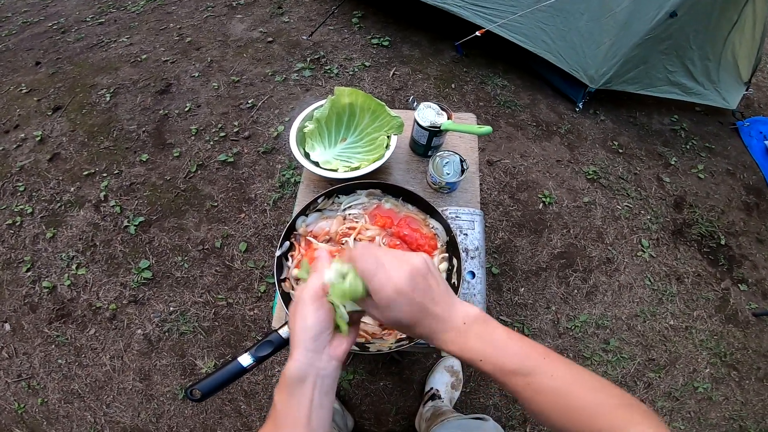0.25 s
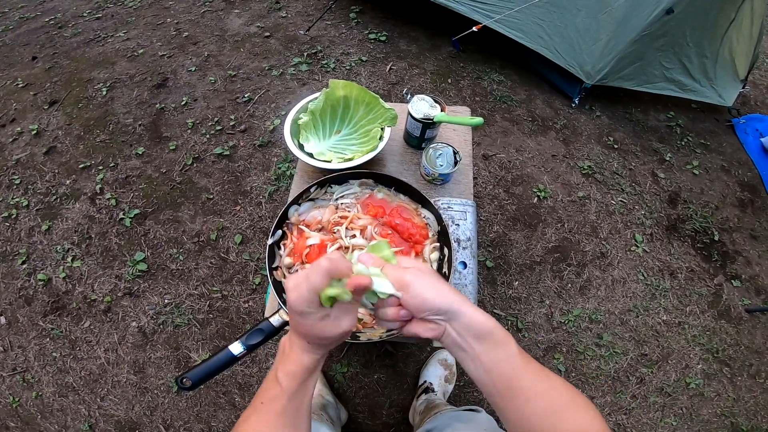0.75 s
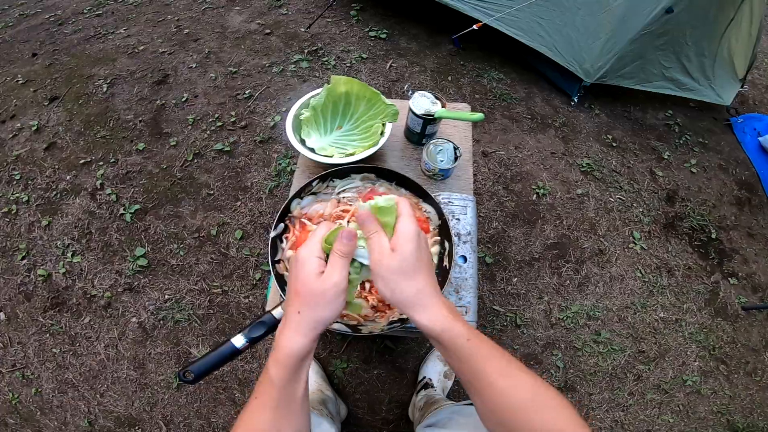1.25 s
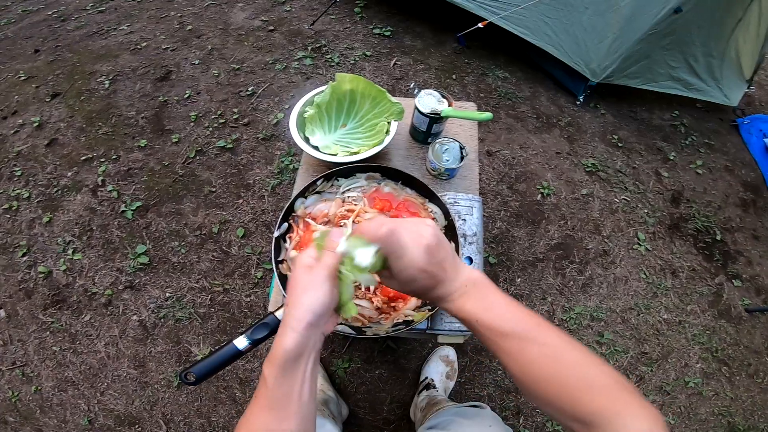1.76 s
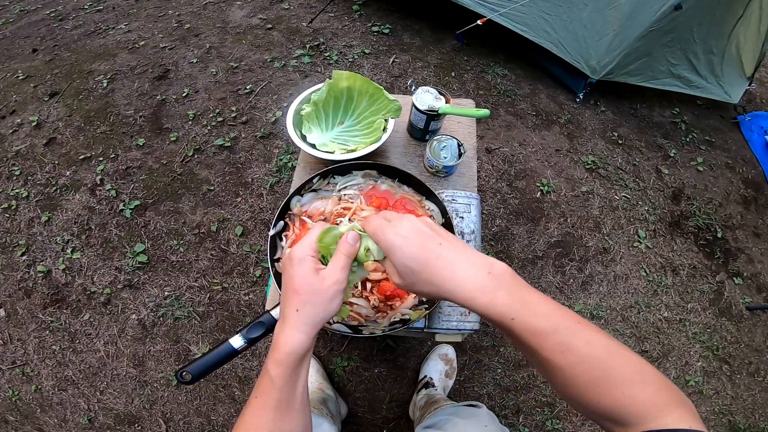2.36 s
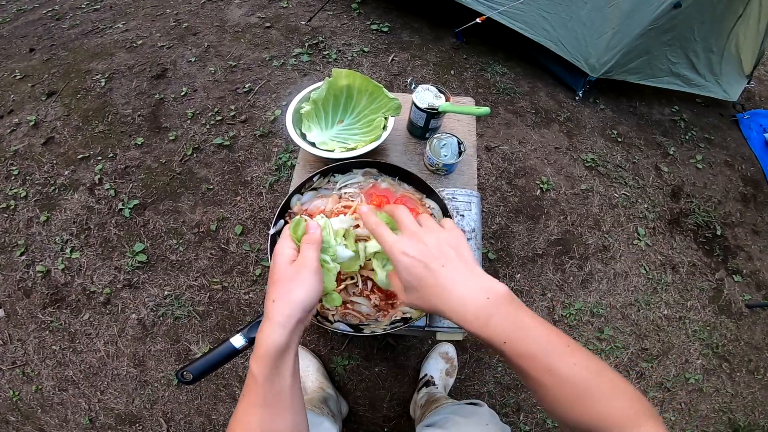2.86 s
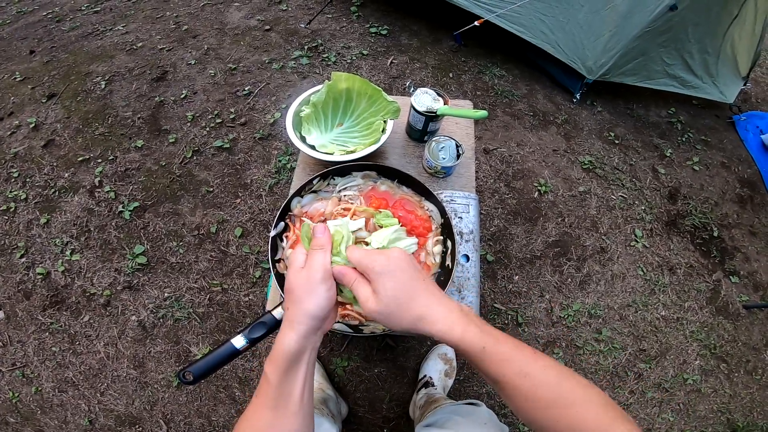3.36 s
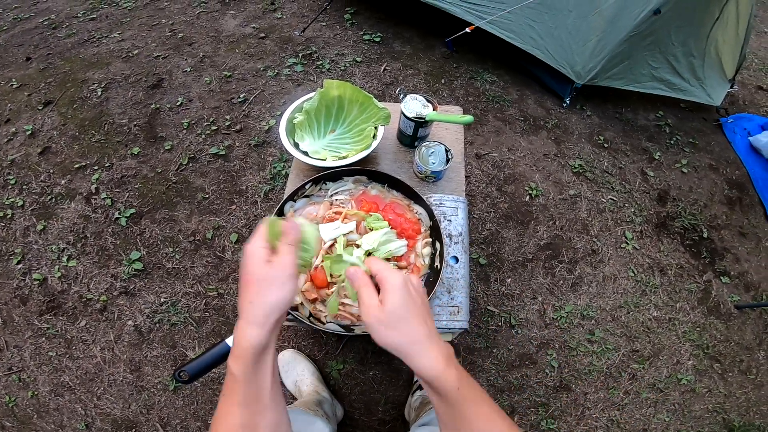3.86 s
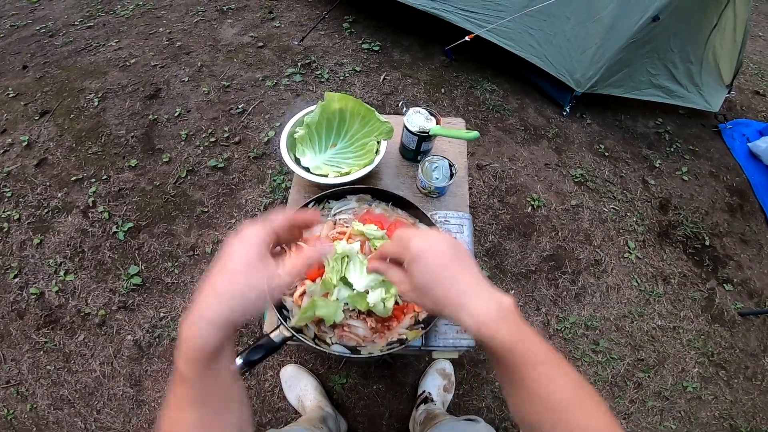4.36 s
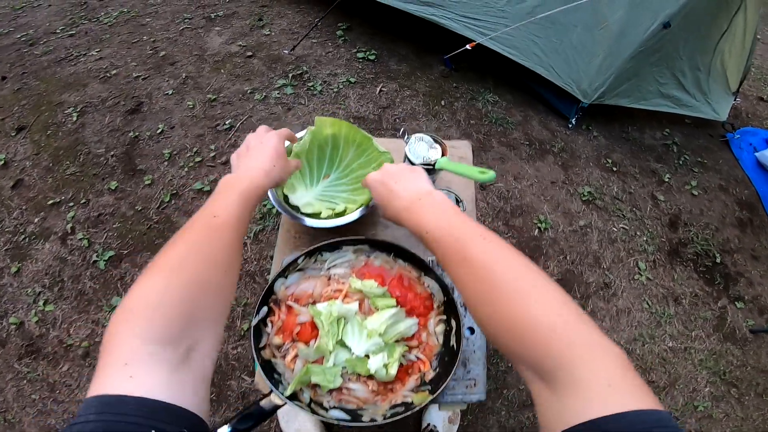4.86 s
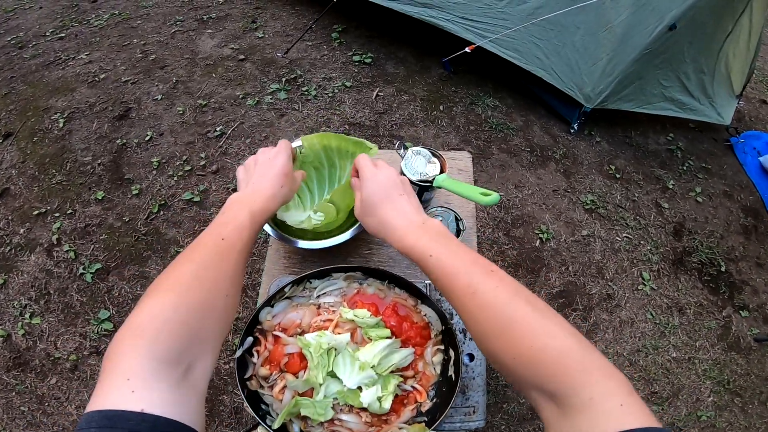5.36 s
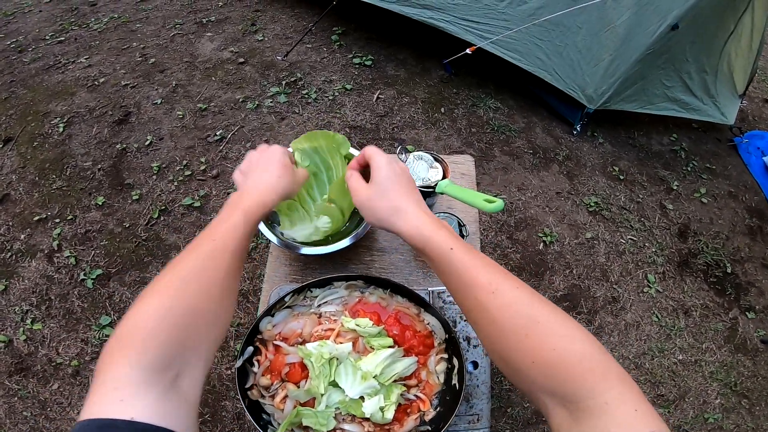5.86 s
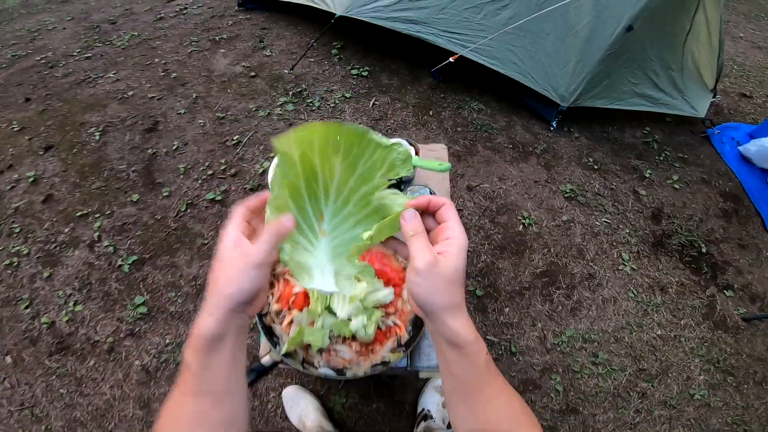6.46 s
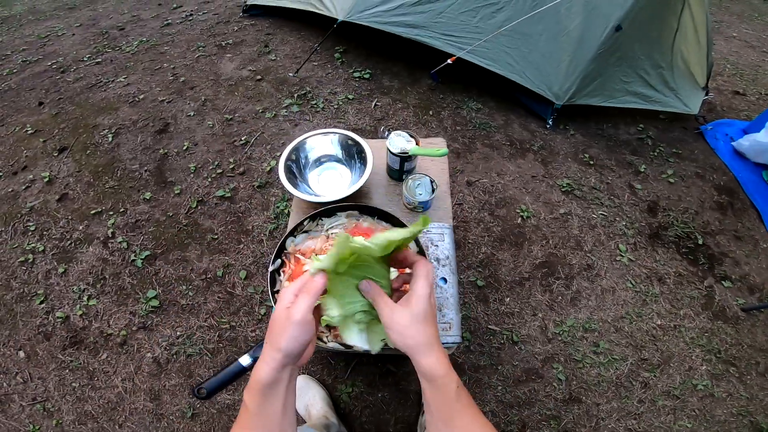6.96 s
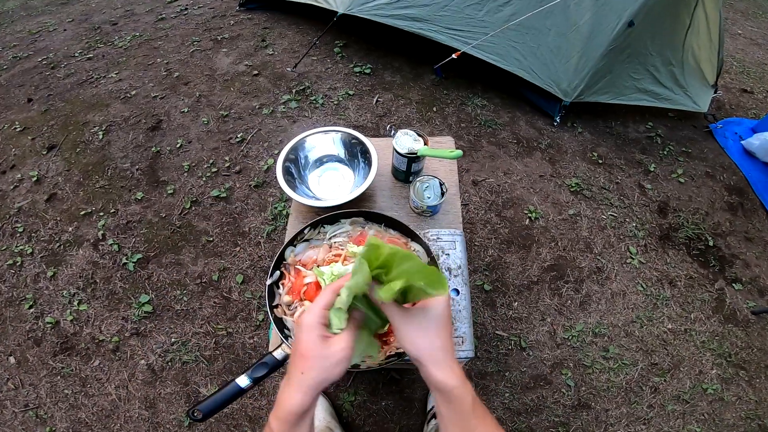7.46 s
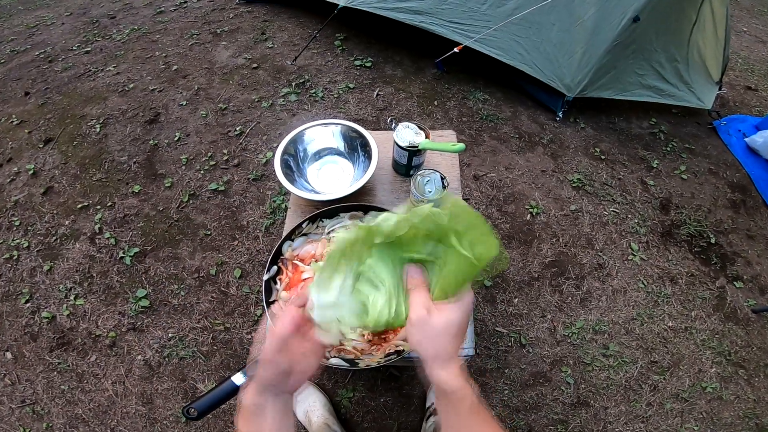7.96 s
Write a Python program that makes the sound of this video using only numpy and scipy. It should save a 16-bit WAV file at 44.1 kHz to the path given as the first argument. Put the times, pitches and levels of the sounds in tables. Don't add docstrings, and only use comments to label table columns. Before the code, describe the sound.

Outdoors at a campsite, a continuous shrill cicada chorus with faint breeze rumble. Close in front, hands tear a crisp cabbage leaf in five bursts of wet, splintery snaps with short gaps. Then a steel bowl rings faintly and knocks on a wooden table as a leaf is lifted out, and the whole leaf bends with duller pops and crackles. Stereo microphone near the head.

```python
import sys
import numpy as np
from scipy import signal
from scipy.fft import rfft, irfft, next_fast_len
from scipy.io import wavfile
from scipy.ndimage import uniform_filter1d, map_coordinates

SR = 44100
rng = np.random.default_rng(int(sys.argv[2]) if len(sys.argv) > 2 else 0)


def dump(signal):
    limited = np.clip(np.atleast_2d(signal).T, -1, 1)
    pcm = np.round(limited * 32767).astype(np.int16)
    wavfile.write(sys.argv[1], SR, pcm)


def amplitude_ratio(level_db):
    exponent = np.asarray(level_db, float) / 20
    return 10 ** exponent


N = 362061

# t/s, peak level/dB, leaf f/Hz, hand hollow level/dB, edge level/dB
TORN_1 = [(0.0057, -21.5, 3315, -17, -12.5), (0.0102, -25.5, 3312, -17.5, -20),
          (0.0144, -22.5, 3288, -20, -20.5), (0.0199, -32, 3560, -16.5, -19.5),
          (0.0289, -31.5, 3516, -7, -20), (0.0403, -31, 3778, -15.5, -20), (0.069, -22.0, 3588, -21, -10),
          (0.0786, -19.5, 3250, -14, -14), (0.0971, -29, 2824, 2.5, -20), (0.1281, -17.0, 3784, -11, -21),
          (0.1513, -34, 3300, -12.5, -20), (0.1559, -18.5, 4406, -17.5, -20),
          (0.1645, -18.5, 3268, -13, -2), (0.1784, -28.5, 3480, -15.5, -3.5),
          (0.2171, -26.5, 3211, -11.5, -20.5), (0.2258, -30, 3411, -7.5, -20),
          (0.2543, -34, 3534, -13, -20), (0.2671, -32.5, 3690, -13, -20), (0.3257, -34.5, 3407, -16, -20),
          (0.3415, -33, 3814, -22, -5)]
TORN_2 = [(0.448, -35, 2757, -16.5, -20), (0.4913, -22.0, 3438, -20.5, -14),
          (0.508, -30.5, 3480, -15.5, -4), (0.5218, -31, 3005, -18, -20), (0.551, -33, 2826, -15, -2.5),
          (0.5562, -28.5, 3878, -21, -20), (0.5694, -20, 3590, -12, -3), (0.5791, -13, 3262, -15.5, -9),
          (0.5853, -29, 3610, -15, -20), (0.6028, -25.5, 3368, -9, -20), (0.6097, -21, 4177, -15, 5),
          (0.6188, -22.5, 3920, -12, -15), (0.6286, -22, 4229, -22, -9), (0.6516, -22, 3546, -12.5, -3),
          (0.6625, -26, 3704, -17.5, -20), (0.6793, -22.5, 4006, -14, -3.5),
          (0.6881, -28.0, 3970, -14, 0.5), (0.6951, -22.0, 3516, -11, 4.5), (0.701, -27.5, 4130, -7.5, 1),
          (0.7069, -30.5, 3570, -7.5, 1), (0.7231, -30.5, 3480, -6, -3), (0.7361, -23.5, 3215, -10.5, 1.5),
          (0.7869, -33, 3460, -16.5, 2.5), (0.7981, -34.5, 3365, -8, 9), (0.8081, -31, 3538, -14.5, -12),
          (0.8126, -30, 4000, -9.5, -20), (0.8372, -28.5, 4010, -6, -13), (0.845, -27.5, 3582, -7, -6),
          (0.8499, -29.0, 3790, -13.5, -20), (0.987, -33, 3403, -22, -20)]
TORN_3 = [(1.3066, -30, 2976, -14.5, -5), (1.3168, -27.5, 3653, -16, 0.5), (1.3508, -18.5, 4289, -19, -1.5),
          (1.3822, -31.5, 2885, -15, 2), (1.4354, -18, 3392, -16.5, -12.5), (1.4413, -32, 3200, -12, -20),
          (1.4649, -26.5, 3641, -13.5, -8), (1.4793, -27, 3798, -20, -6.5), (1.4974, -30, 4260, -16.5, 1.5),
          (1.5241, -24.0, 3780, -14, -9), (1.5267, -25, 3502, -16.5, -1.5), (1.5292, -13, 3755, -8.5, -4),
          (1.5644, -23.5, 3234, -6, -11), (1.5943, -33, 3240, -1.5, -1), (1.61, -30.0, 3791, -12, 2.5),
          (1.6689, -24.5, 3628, -20, -9.5), (1.7454, -40, 3460, 4, -2), (1.7719, -27.5, 3390, -5.5, 0),
          (1.7778, -31.0, 2818, -11.5, -20), (1.7811, -34.5, 2830, -3.5, -20)]
TORN_4 = [(2.3491, -29, 3850, -14, -12), (2.3574, -23, 3673, -16.5, -7.5), (2.3675, -27.5, 3300, -8.5, -20),
          (2.3873, -25.5, 3840, -15.5, -11), (2.3919, -22.5, 3815, -20.5, -20.5),
          (2.3958, -31, 3920, -16.5, -20), (2.413, -31, 3360, -12, -2), (2.4252, -29, 4010, -16.5, -4),
          (2.4596, -24.5, 3763, -21, -5), (2.472, -28.5, 3673, -18.5, -7.5),
          (2.4984, -27.0, 3770, -19, -5.5), (2.5158, -32.5, 3085, -15.5, -20),
          (2.5289, -19.5, 3455, -23.5, -9), (2.5374, -27.5, 3820, -13.5, 1),
          (2.5429, -30.5, 4210, -11.5, 2), (2.5596, -28.0, 3415, -5, -1), (2.5766, -31.0, 3780, -7, 2.5),
          (2.6211, -27, 3582, -17.5, -8.5)]
TORN_5 = [(3.2257, -25.0, 3058, -21.5, -5.5), (3.2297, -31.5, 4243, -19.5, -6),
          (3.249, -26.5, 3526, -12, -5.5), (3.2566, -30.5, 3050, -10, -20),
          (3.2658, -29.5, 4210, -7.5, -20), (3.2784, -18.5, 3527, -14, -4.5),
          (3.2949, -26.5, 4282, -4.5, 4.5), (3.299, -29.5, 3440, -11.5, 4.5),
          (3.3112, -29, 3150, -9.5, -20), (3.3185, -21, 4020, -11, 0.5), (3.324, -23, 3043, -12.5, 5),
          (3.3981, -33, 2980, -6.5, -20), (3.4054, -29.5, 3414, -18.5, 1.5), (3.4112, -32, 3210, -6.5, 5),
          (3.421, -22, 3435, -8.5, -7.5), (3.4301, -18.5, 3763, -18.5, -2), (3.4342, -29, 4370, -9.5, -4),
          (3.4747, -19.5, 3876, -21.5, -10), (3.5222, -20.5, 4030, -8.5, -8.5),
          (3.5583, -32, 4210, -11.5, -20), (3.5637, -25.5, 3740, -14, -3.5),
          (3.5681, -17.5, 3347, -20, -7.5), (3.5882, -22, 4014, -14.5, -9.5),
          (3.6022, -20.5, 4039, -14.5, -6.5), (3.607, -23, 4262, -16.5, 3), (3.6521, -30, 3934, -18.5, 1),
          (3.6705, -30, 3757, -7.5, -20), (3.69, -27.5, 4320, -14, -10), (3.7089, -30.5, 3890, -17, -0.5),
          (3.7187, -27.5, 3592, -15.5, 1), (3.731, -22.0, 3494, -12, -10.5),
          (3.7378, -15.5, 3765, -19.5, -6), (3.7443, -22.0, 3775, -6.5, -3),
          (3.7556, -32.5, 2900, -10, -20), (3.772, -37, 3000, -9.5, -20), (3.787, -37.5, 3006, -7.5, -20)]
# hollow f/Hz, palm f/Hz, palm level/dB
HAND_CAVITIES = [
    (1838.9, 1114, -14),
    (1580, 751.2, -9.5),
    (1647.3, 853, -14),
    (1930, 784.4, -11),
    (1930, 1012.1, -8),
]
# start t/s, end t/s, level/dB
TEAR_HOLDS = [
    (0, .03, -43.5),
    (.05, .27, -52),
    (.28, .45, -57.5),
    (.46, .85, -53),
    (.67, .73, -44),
    (.81, .853, -42),
    (1.3, 1.61, -54),
    (1.76, 1.79, -48.5),
    (2.34, 2.62, -49),
    (3.22, 3.75, -51),
]
# start t/s, end t/s, level/dB
BEND_HOLDS = [
    (6.78, 8.21, -57.5),
    (6.99, 7.07, -56.5),
    (7.62, 7.88, -49.5),
    (7.9, 8.07, -57),
    (7.25, 7.36, -58.5),
]
# t/s, peak level/dB, f/Hz, second f/Hz, its level/dB
FOLD_POPS = [(5.7597, -29, 3000, 1900, -1), (6.1656, -35, 2197, 1109, -4), (6.3148, -31, 3510, 1920, -16),
             (6.7992, -36, 1679, 1001, 0.5), (6.8425, -37, 890.6, 3546, -15),
             (6.9052, -37.5, 2270, 1340, -6.5), (7.014, -29.0, 1137, 2585, -10),
             (7.0345, -39, 1110, 3840, -1), (7.05, -39.0, 1090, 1580, -10), (7.061, -38, 1180, 2752, -7.5),
             (7.1192, -32.5, 1312, 2923, -13), (7.1315, -34, 1930, 842, -0.5),
             (7.173, -33.5, 1062, 2520, -18.5), (7.192, -30.5, 2522, 1101, -5), (7.2774, -39, 891, 2420, 1),
             (7.2971, -26, 3320, 1057, -2.5), (7.3466, -33.5, 1699, 1149, -3.5),
             (7.3554, -27, 1017, 3699, -9), (7.4738, -31, 1892, 1110, -1), (7.4796, -34, 1890, 3230, -7),
             (7.5501, -36.5, 1683, 861, -6), (7.571, -35.0, 1076, 1949, -6), (7.593, -31.5, 2219, 1067, -3),
             (7.65, -34.5, 1178, 809, -2), (7.6586, -36, 1140, 699.6, -0.5),
                (7.6887, -33.5, 1100, 2250, -10.5), (7.7246, -36, 1030, 1500, -6),
                (7.7494, -35.5, 1080, 1770, -2), (7.7886, -36, 748.3, 1644, -2.5),
                (7.8321, -33, 1510, 3553, 1), (7.8429, -32, 861.3, 1272, -1.5),
                (7.8483, -31, 1070, 1862, -2), (7.8556, -34.0, 979.4, 2022, -4.5),
                (7.8872, -31.5, 1667, 1030, 0), (7.9065, -26.5, 1789, 963, -1),
                (7.913, -33, 1711, 3042, 0.5), (7.9695, -23.0, 3029, 1804, -0.5),
                (7.974, -30.5, 1800, 3040, 0), (8.0277, -26, 1737, 795.2, -2), (8.0567, -33, 1768, 3006, 0),
                (8.117, -33, 2825, 1211, -1.5), (8.1397, -30, 1859, 1030, -11),
                (8.1643, -29.5, 2887, 2013, -4.5), (8.1705, -27, 1800, 3226, -4.5)]
STRAY_POPS = [
    (3.503, -32, 1969, 3790, -4),
    (2.597, -35, 1190.7, 3300, -4),
    (7.242, -42, 1128, 1650, -3.5),
    (7.979, -31, 2173, 3322, 0),
    (7.632, -35.5, 870.7, 1130, -5),
]

# f/Hz, level/dB, t60/s
BOWL_MODES = [(1379.9, -1.5, 0.3131), (1409.5, 1, 0.1376), (1593.9, -8, 0.3106), (1920, -8, 0.2143),
              (2070, -5, 0.603), (2440.7, -1, 0.4), (2717.4, -5, .3), (3011.8, 0, 0.28),
              (3646.7, -7, 0.315)]
# t/s, level/dB
BOWL_TOUCHES = [
    (5.039, -38.5),
    (5.195, -51),
    (5.358, -40),
    (5.478, -51),
    (5.631, -54.5),
]
# f/Hz, width/Hz, level/dB
BOARD_MODES = [(206.34, 40, -2), (279.28, 22, 4), (520, 400, -15), (1030, 300, -18), (1594, 516, -17),
               (145.03, 67.97, -7)]
# t/s, peak level/dB
BASE_KNOCKS = [(5.034, -53), (5.163, -50), (5.19, -47.5), (5.215, -52), (5.344, -38.5), (5.379, -44.5),
               (5.442, -29.5), (5.469, -36), (5.499, -44), (5.61, -36), (5.629, -35.5), (5.647, -34.5),
               (5.672, -47), (5.69, -48), (6.62, -49)]
# t/s, half length/s, f/Hz, glide/(Hz/s), level/dB
SQUEAKS_AND_POP = [
    (5.143, .0035, 3650, -35000, -28),
    (5.151, .002, 3250, -20000, -35),
    (2.087, .005, 950, 0, -45),
]

# t/s, left cicada, right cicada, katydid
THROB_COUNTS = [
    (0, .2, -.37, .25),
    (4.5, 48.78, 47.95, 126.1),
    (8.3, 89.75, 88.1, 232.3),
]
# throb column, click rate/Hz, slack f/Hz, tight f/Hz, throb depth/dB, level/dB, pan/dB, ring t60/s
NEAR_SINGERS = [
    (0, 324, 6400, 7600, 7, -48, 9, .0035),
    (0, 324, 10800, 13800, 8, -64.5, -2, .0008),
    (1, 309, 5420, 5680, 10, -39, -9, .009),
    (2, 470, 9000, 9300, 10, -59, 4, .005),
]
# t/s, far mass/dB, late high singer/dB, near singers' swell/dB
CHORUS_LEVELS = [
    (0.0, -34.5, -56, -1.5),
    (2.63, -34, -60.5, -1.5),
    (3.5, -34, -52.5, -.3),
    (4.7, -35, -56.5, 1.5),
    (8.21, -33.5, -59, .7),
]
# f/Hz, density/(dB per Hz)
MASS_SPECTRUM = [(1760, -44), (3000, -31), (3400, -38.5), (4090, -21), (4660, -5.5), (5540, -1.5),
                 (7250, -4.5), (7880, -12), (8620, -23), (9360, -26), (10600, -23), (14200, -33),
                 (14900, -38), (15600, -44)]
# f/Hz, left minus right/dB
MASS_BALANCE = [(60, -3), (110, -2), (200, 3), (380, 3), (700, -4), (1290, -7.5), (2380, 0), (4400, -2.5),
                (8120, -7.5), (15000, 10)]
# f/Hz, left-right likeness
MASS_LIKENESS = [(3000, 0.4334), (5500, 0.2226), (8000, 0.0654), (15000, 0.045)]

# t/s, peak level/dB, 20 dB fade/s, extra flutter/dB
WIND_GUSTS = [(.223, -43, 0.2865, 1), (.656, -48, 0.1042, -3.5), (1.08, -55, 0.4276, 0),
              (1.545, -44, 0.1596, -2), (1.731, -49, 0.4843, -1), (2.24, -44.5, 0.3528, -1.5),
              (2.35, -46.5, 0.1463, -2), (2.7, -60.5, 0.1739, 6), (2.97, -58.5, 0.2137, 3.5),
              (3.44, -57.5, 0.2346, 3.5), (3.955, -54, 0.1607, -2), (4.46, -50, 0.4152, 1),
              (5.066, -56.5, 0.1069, 1.5), (5.5, -57, 0.001, 9), (5.66, -54.5, 0.1133, 6),
              (5.987, -46.5, 0.2139, -2), (6.294, -48, 0.3011, 11), (6.64, -49.5, 0.2235, 7),
              (7.12, -58.5, 0.3337, 1), (7.49, -57, 0.02, -0.5), (7.644, -46, 0.2094, 5),
              (8.2, -46, 0.3357, -4)]
# f/Hz, density/(dB per Hz)
BUFFET_SPECTRUM = [(8, -32), (22, 1.5), (40, 1), (60, -15.0), (100, -38.5), (200, -120)]
FLUTTER_SPECTRUM = [(30, -56), (60, 1.5), (100, -9.0), (150, -12), (300, -29.0), (600, -120)]
# f/Hz, density/(dB per Hz)
AIR_SPECTRUM = [(59, -46), (120, -10), (318, -7.5), (366, -6.5), (490, -7.5), (1160, -7.5), (1740, -9),
                (3380, -9), (4000, -6), (5200, -12.5), (8800, -120)]
# f/Hz, left-right likeness
AIR_LIKENESS = [(100, 0.543), (300, 0.672), (700, 0.395), (1500, 0.04604), (3000, 0.6956)]

GRIP_S, LET_GO_S = 0.04776, 0.02221
TRAIL_DB, TRAIL_GROWTH, TRAIL_S = -48, 0.4366, 0.011315
LEAD_S, LEAD_CYCLES = .0002, .3
LEAF_WIDTH, HOLLOW_WIDTH, PALM_WIDTH, CREASE_WIDTH = .52, .22, 0.34355, 0.33597
HOLLOW_DB, EDGE_DB, SPRAY_DB, EDGE_HZ, SPRAY_HZ = -4, -2, -27, 6221, 9600
LULL_DB, FLUTTER_DB, FLUTTER_GROWTH = -72.5, -45, 1.7357
AIR_DB, AIR_SWELL_DB = -51.5, 2.5


def unit(x):
    return x / np.sqrt(np.mean(x ** 2) + 1e-20)


def along(points, hz):
    f, value = np.transpose(points)
    return np.interp(np.log(hz + 1), np.log(f + 1), value)


def curves(rows):
    s, *columns = np.transpose(rows)
    return [np.interp(np.arange(N) / SR, s, column) for column in columns]


def wobble(rate_hz):
    knots = rng.standard_normal(int(N * rate_hz / SR) + 4)
    return map_coordinates(knots, [np.arange(N) * rate_hz / SR])


def filtered(x, response):
    size = next_fast_len(N + SR // 2)
    return irfft(rfft(x, size) * response(np.fft.rfftfreq(size, 1 / SR)), size)[..., :N]


def resonance(f, hz, width_hz):
    return 1j * f * width_hz / (hz * hz - f * f + 1j * f * width_hz)


def panned(x, pan_db):
    return np.array([x * amplitude_ratio(pan_db / 2), x * amplitude_ratio(-pan_db / 2)])


def rush(spectrum, alike, patchy_db):
    z = signal.stft(rng.standard_normal((2, N)), nperseg=512)[2]
    field = uniform_filter1d(rng.standard_normal(z.shape[1:]), 6, 0)
    field = uniform_filter1d(field, 8, 1)
    pair = signal.istft(z * amplitude_ratio(patchy_db * unit(field)), nperseg=512)[1][:, :N]

    def mid_side(hz):
        angle = np.arccos(np.clip(along(alike, hz), -1, 1)) / 2
        return amplitude_ratio(along(spectrum, hz)) * [np.cos(angle), np.sin(angle)]

    mid, side = filtered(pair, mid_side)
    return unit(np.array([mid + side, mid - side]))


def grains(times, hz, gain, t60, size=256):
    start = np.floor(times * SR).astype(int) + 1
    index = start[:, None] + np.arange(size)
    t = index / SR - times[:, None]
    cycles = hz[:, None] * t
    attack = np.sin(np.pi / 2 * np.minimum(cycles / 2, 1)) ** 2
    decay = amplitude_ratio(-60 * t / np.reshape(t60, (-1, 1)))
    waves = gain[:, None] * attack * np.sin(2 * np.pi * cycles) * decay
    return np.bincount(index.ravel(), waves.ravel(), N + SR)[:N]


def foliage(x, t60):
    t = np.arange(SR // 4) / SR
    tail = rng.standard_normal((2, len(t))) * amplitude_ratio(-60 * t / t60)
    return signal.fftconvolve(x[None], tail / np.linalg.norm(tail[0]), axes=1)[:, :N]


def swell(start, end, db, rise_s, fall_s):
    clock = np.arange(0, N, 32) / SR
    away = np.maximum(start - clock, 0) / rise_s + np.maximum(clock - end, 0) / fall_s
    return np.repeat(amplitude_ratio(db - 20 * away), 32)[:N]


def cabbage():
    tear, fold = tearing(), folding()
    return panned(tear, -3) + panned(fold, -8) + amplitude_ratio(-17) * foliage(tear + fold, t60=.02)


def tearing():
    pieces = [TORN_1, TORN_2, TORN_3, TORN_4, TORN_5]
    torn = [row for piece in pieces for row in piece]
    breaks = []
    for piece, (hollow_hz, palm_hz, palm_db) in zip(pieces, HAND_CAVITIES):
        chance = rng.standard_normal((len(piece), 4))
        for (s, db, leaf_hz, hollow_db, edge_db), (a, b, c, d) in zip(piece, chance):
            hands_db = hollow_db + HOLLOW_DB
            modes = [(leaf_hz, LEAF_WIDTH, -1.5),
                     (hollow_hz * (1 + 0.03496 * a), HOLLOW_WIDTH, hands_db),
                     (palm_hz, PALM_WIDTH, hands_db + palm_db + 3 * b),
                     (EDGE_HZ * (1 + 0.04135 * c), .3, edge_db + EDGE_DB),
                     (SPRAY_HZ * np.exp(.05 * d), .12, 0.378 * edge_db + SPRAY_DB + 3 * c)]
            breaks.append((s, db - 1.2 + .05 * (db + 18), modes))
    tear = amplitude_ratio(3) * snaps(breaks, t60=0.006352, rise_s=0.0002719)
    pull = effort(TEAR_HOLDS, torn, TRAIL_DB)
    return tear + amplitude_ratio(2) * crackle(pull, count=13000, hz=3200, spread=.3, cycles=5.696, size_db=2.9)


def folding():
    folds = FOLD_POPS
    width = lambda hz: CREASE_WIDTH * (hz / 2200) ** 0.5843
    pops = []
    for s, db, hz, second_hz, second_db in [*folds, *STRAY_POPS]:
        second_level_db = second_db - 1.5 + 4 * np.log2(second_hz / hz)
        modes = [(hz, width(hz), -1.5), (second_hz, width(second_hz), second_level_db)]
        pops.append((s, db + .22 * (db + 27.5), modes))
    fold = amplitude_ratio(-.7) * snaps(pops, t60=0.005544, rise_s=0.0004383)
    bend = effort(BEND_HOLDS, folds, TRAIL_DB - 10.5)
    fold += amplitude_ratio(-3.0) * crackle(bend, count=12000, hz=946.65, spread=0.24778, cycles=11.32, size_db=2.5)
    fold += amplitude_ratio(-6.5) * crackle(bend, count=9000, hz=1800, spread=0.2126, cycles=8.68, size_db=2.5)
    fold += amplitude_ratio(-7) * crackle(bend, count=4000, hz=211.14, spread=0.30426, cycles=2.91, size_db=1.5)
    return fold


def snaps(rows, t60, rise_s):
    out, f = np.zeros(N + SR), np.fft.rfftfreq(1024, 1 / SR)
    t = np.arange(1024) / SR
    envelope = amplitude_ratio(-60 * t / t60) * (1 - np.exp(-t / rise_s))
    for s, db, modes in rows:
        burst = rfft(rng.standard_normal(1024) ** 3 * envelope)
        burst = burst * resonance(f, 3229, 8764)
        for k, (hz, share, level_db) in enumerate(modes):
            width_hz = share * hz
            steep = resonance(f, hz, width_hz) * resonance(f, hz, 2.2822 * width_hz) ** 2
            ring = (-1) ** k * irfft(burst * steep)
            lead_s = min(LEAD_S + LEAD_CYCLES / width_hz, s)
            out[round((s - lead_s) * SR):][:1024] += amplitude_ratio(db + level_db) * ring / np.abs(ring).max()
    return out[:N]


def crackle(pull, count, hz, spread, cycles, size_db):
    chance = rng.random((count, 3))
    pitch = np.clip(hz * np.exp(spread * rng.standard_normal(count)), 120, 12000)
    gain = np.sqrt(pitch) * amplitude_ratio(-size_db * np.log(chance[:, 1] + 0.0002754))
    return pull * unit(grains(chance[:, 0] * N / SR, pitch, gain, cycles / pitch))


def effort(holds, breaks, trail_db):
    steady = sum(swell(*row, GRIP_S, LET_GO_S) for row in holds)
    places = [round(row[0] * SR) for row in breaks]
    powers = [amplitude_ratio(trail_db + TRAIL_GROWTH * (row[1] + 20)) ** 2 for row in breaks]
    marks = np.bincount(places, powers, N)[:N]
    surge = np.exp(-.5 * (np.arange(-SR // 10, SR // 10 + 1) / SR / TRAIL_S) ** 2)
    return np.sqrt(steady ** 2 + np.abs(signal.fftconvolve(marks, surge, "same")))


def bowl():
    out, blows, t = np.zeros(N + SR), np.zeros((2, N)), np.arange(SR // 2) / SR
    short = t[:900]
    for s, db in BOWL_TOUCHES:
        ring = 0
        for hz, level_db, t60 in BOWL_MODES:
            decay = amplitude_ratio(level_db + rng.normal(0, 1.5) - 60 * t / t60)
            drift = .012 * np.cumsum(rng.standard_normal(len(t)))
            ring = ring + decay * np.sin(2 * np.pi * hz * t + drift)
        out[round(s * SR):][:len(t)] += amplitude_ratio(db - 8.5) * ring
        contact = amplitude_ratio(-60 * short / 0.00935) * rng.standard_normal(900)
        blows[1, round(s * SR):][:900] += amplitude_ratio(db + 16) * contact
    for s, db in BASE_KNOCKS:
        grit = 1.3 + .8 * rng.standard_normal(900)
        thud = grit * short / 0.002 * amplitude_ratio(-60 * short / 0.018)
        blows[0, round(s * SR):][:900] += amplitude_ratio(db + 30) * thud

    def board(f):
        return sum((-1) ** k * amplitude_ratio(db) * resonance(f, hz, width_hz)
                   for k, (hz, width_hz, db) in enumerate(BOARD_MODES))

    knock, tick = filtered(blows, lambda f: [board(f) * resonance(f, 216, 909.6), resonance(f, 3062, 1788)])
    clock = np.arange(N) / SR
    for s, half_s, hz, glide, db in SQUEAKS_AND_POP:
        u = clock - s
        tone = np.sin(2 * np.pi * (hz * u + glide * u * u / 2))
        out[:N] += amplitude_ratio(db) * np.exp(-.5 * (u / half_s) ** 2) * tone
    return panned(out[:N] + knock + tick, -1.497)


def insects():
    mass_db, late_db, near_db = curves(CHORUS_LEVELS)
    throbs = curves(THROB_COUNTS)
    tilt = lambda hz: amplitude_ratio(along(MASS_BALANCE, hz) * np.array([[.5], [-.5]]))
    mass_gain = amplitude_ratio(mass_db - 0.5 + 0.5311 * wobble(8.3))
    out = mass_gain * filtered(rush(MASS_SPECTRUM, MASS_LIKENESS, patchy_db=0.9111), tilt)
    for column, rate_hz, slack_hz, tight_hz, depth_db, db, pan_db, ring_s in NEAR_SINGERS:
        song = singer(throbs[int(column)], rate_hz, slack_hz, tight_hz, depth_db, ring_s)
        song = song * amplitude_ratio(db + near_db + 1.1 * wobble(2.2))
        out += amplitude_ratio(-3) * panned(1, pan_db)[:, None] * (song + foliage(song, t60=.04))
    joined = np.clip((np.arange(N) / SR - 2.6) / 0.308, 0, 1)
    late = singer(throbs[0], 472, 8700, 9500, 0, .0022) * amplitude_ratio(late_db + .5) * joined
    return out + panned(1, -6)[:, None] * foliage(late, t60=.04)


def singer(throb, rate_hz, slack_hz, tight_hz, depth_db, ring_s):
    times = (np.arange(int(rate_hz * N / SR)) + .5) / rate_hz
    chance = rng.standard_normal((len(times), 3))
    drift_s = .003 * wobble(1.5)[(times * SR).astype(int)]
    times = np.abs(times + drift_s + .06 * chance[:, 0] / rate_hz)
    index = np.minimum(times * SR, N - 1).astype(int)
    phase = 2 * np.pi * (throb + 0.09635 * wobble(5))[index]
    tight = .5 + .5 * np.cos(phase - .6 * np.cos(phase))
    hz = slack_hz + (tight_hz - slack_hz) * (tight + .2 * chance[:, 1])
    level_db = depth_db * (tight - .5) + 1.8464 * chance[:, 2]
    return unit(grains(times, hz, amplitude_ratio(level_db), ring_s))


def breeze():
    push, flap = amplitude_ratio(LULL_DB), amplitude_ratio(LULL_DB - 10.5)
    for s, db, fade_s, extra_db in WIND_GUSTS:
        push = push + swell(s, s, db, fade_s, fade_s)
        flap_db = FLUTTER_DB + FLUTTER_GROWTH * (db + 43) + extra_db
        flap_s = fade_s / FLUTTER_GROWTH
        flap = flap + swell(s, s, flap_db, flap_s, flap_s)
    buffet = rush(BUFFET_SPECTRUM, [(30, 0.1576)], patchy_db=1.5)
    flutter = rush(FLUTTER_SPECTRUM, [(30, 0.11)], patchy_db=2.0)
    flutter = unit(flutter * amplitude_ratio(3.726 * np.array([wobble(10), wobble(9)])))
    return (amplitude_ratio(3) * push * buffet + amplitude_ratio(4) * flap * flutter) * amplitude_ratio([[-1.2], [1.2]])


def air():
    hum = amplitude_ratio(.5 * wobble(2.5)) * rush(AIR_SPECTRUM, AIR_LIKENESS, patchy_db=.8)
    low = filtered(hum, lambda hz: 1 / (1 + (hz / 600) ** 4))
    growth = amplitude_ratio(np.linspace(-AIR_SWELL_DB, AIR_SWELL_DB, N))
    return amplitude_ratio(AIR_DB - .5) * (hum + (growth - 1) * low)


def scene():
    return insects() + air() + breeze() + cabbage() + bowl()


def top_cut(x):
    return signal.sosfilt(signal.butter(12, 15740, fs=SR, output="sos"), x)


def record(dry):
    need = np.minimum(1, amplitude_ratio(-3.5) / (np.abs(dry).max(0) + 1e-9))
    cut = signal.lfilter([1], [1, -np.exp(-1 / (0.026 * SR))], 1 - need)
    heard = filtered(dry / (1 + .08 * cut), lambda hz: hz < 15750)
    return top_cut(heard)


dry = scene()
out = record(dry)
dump(out)
```